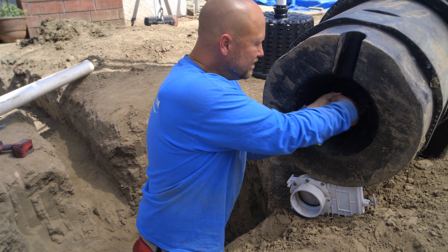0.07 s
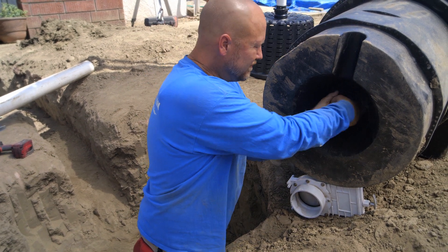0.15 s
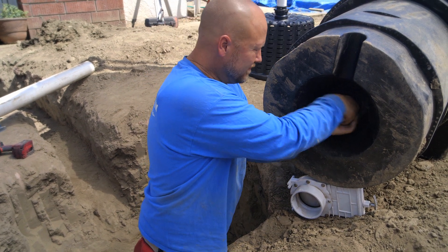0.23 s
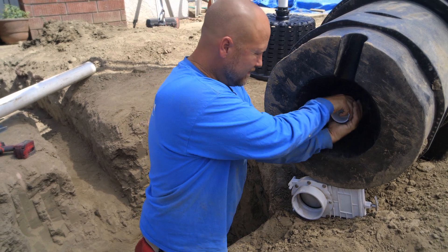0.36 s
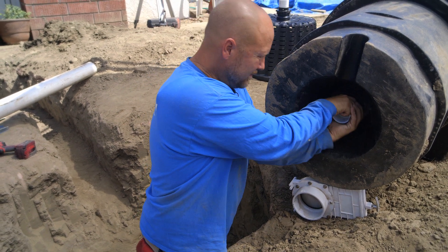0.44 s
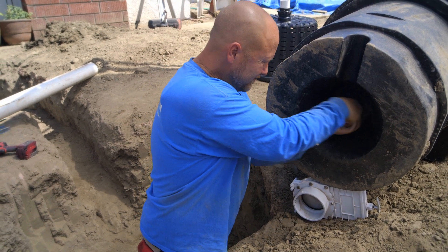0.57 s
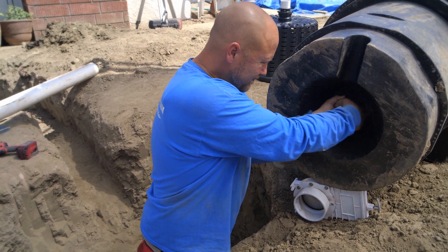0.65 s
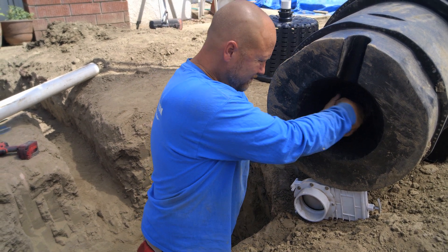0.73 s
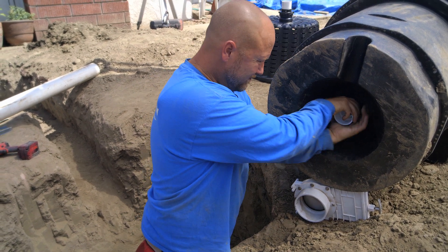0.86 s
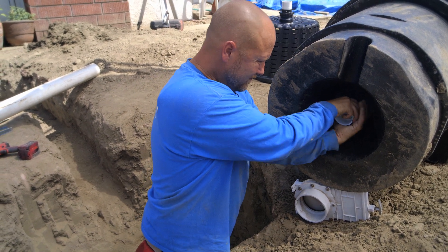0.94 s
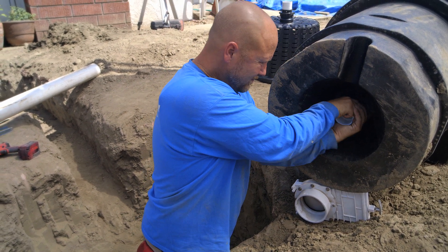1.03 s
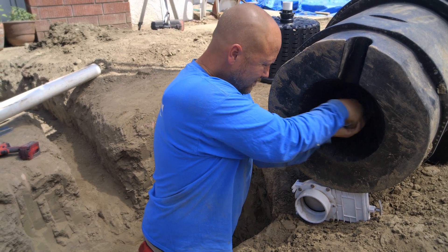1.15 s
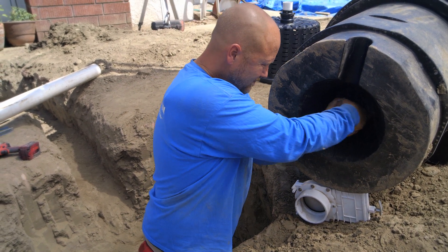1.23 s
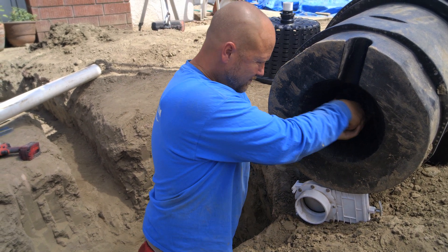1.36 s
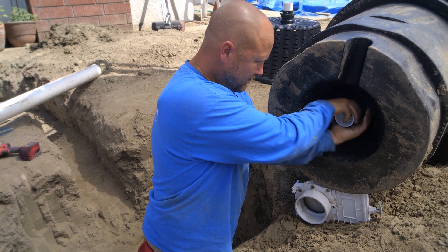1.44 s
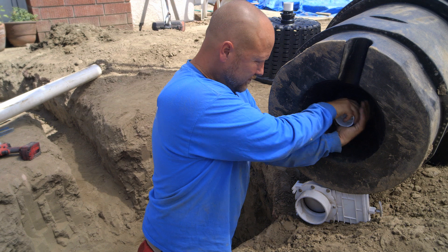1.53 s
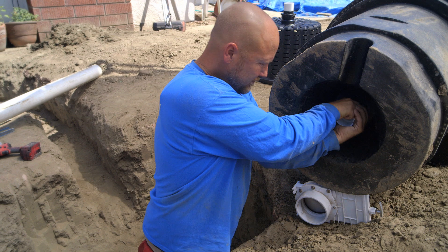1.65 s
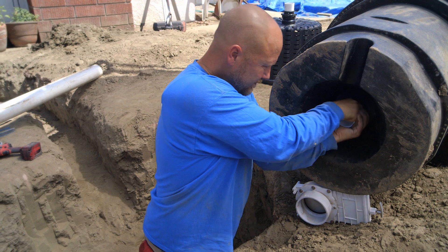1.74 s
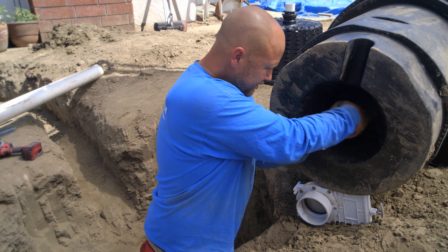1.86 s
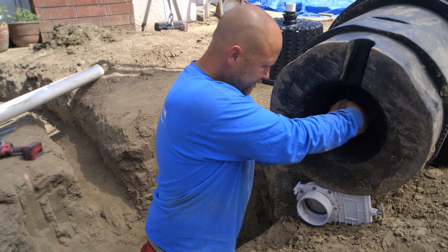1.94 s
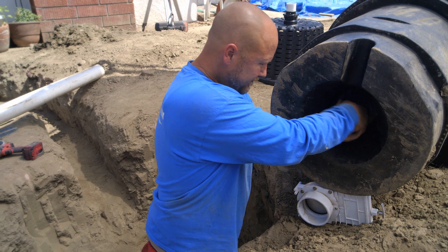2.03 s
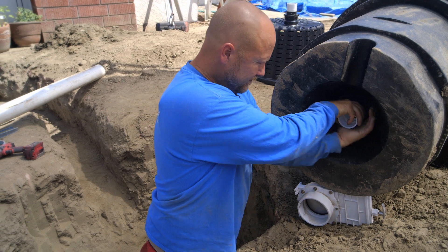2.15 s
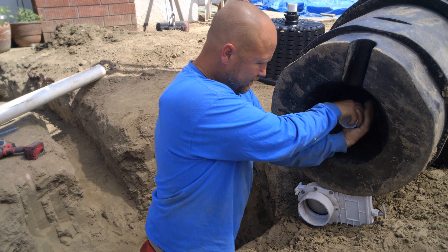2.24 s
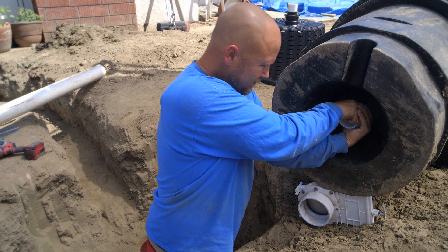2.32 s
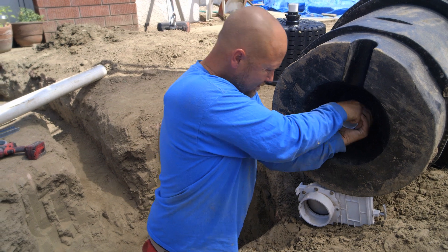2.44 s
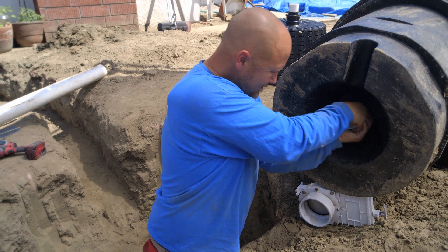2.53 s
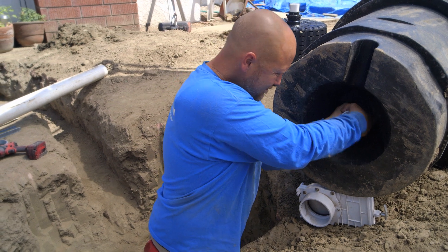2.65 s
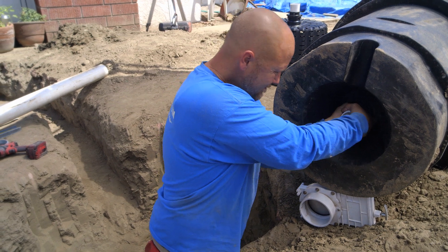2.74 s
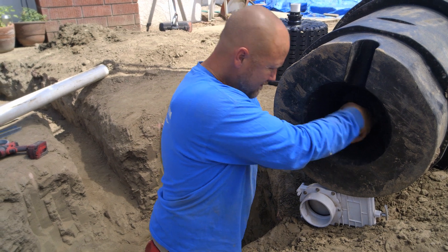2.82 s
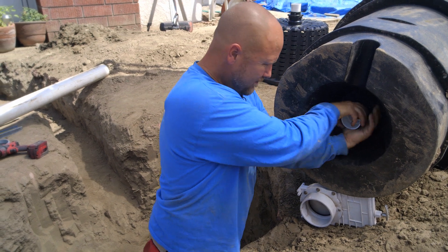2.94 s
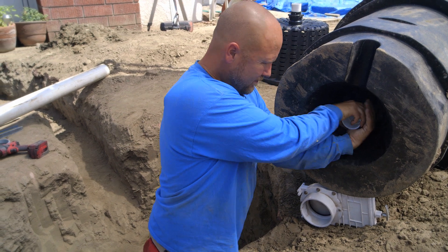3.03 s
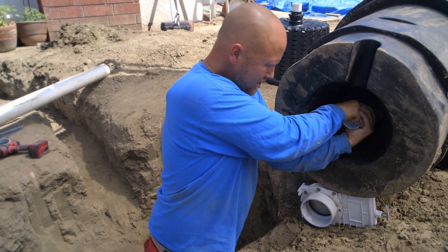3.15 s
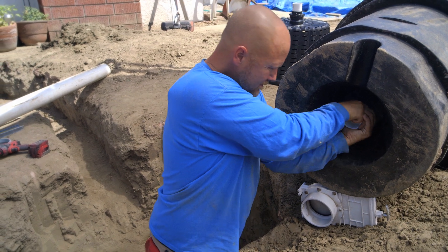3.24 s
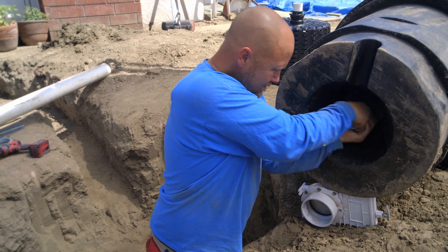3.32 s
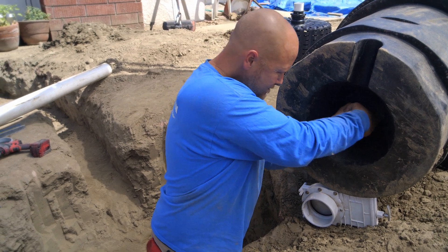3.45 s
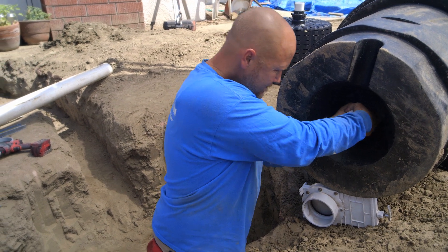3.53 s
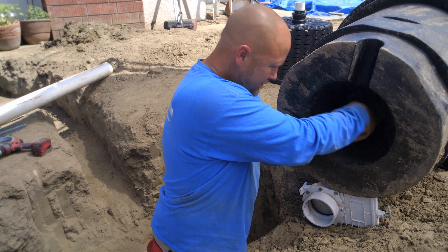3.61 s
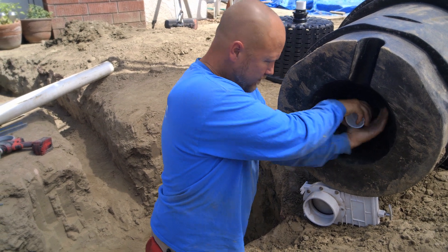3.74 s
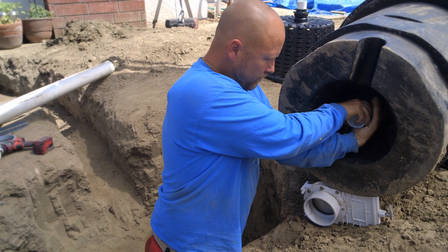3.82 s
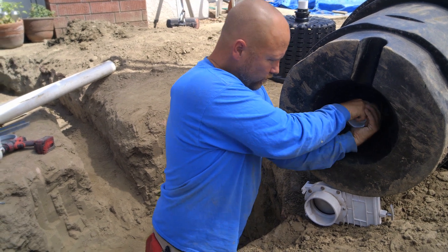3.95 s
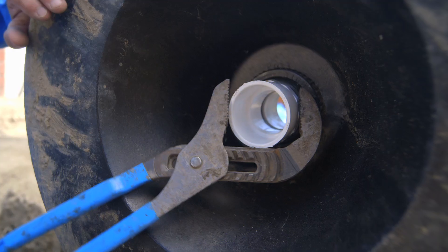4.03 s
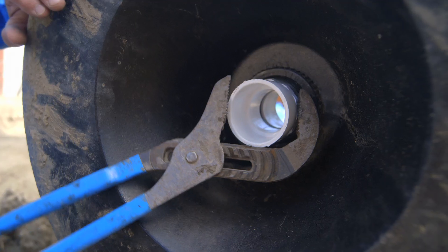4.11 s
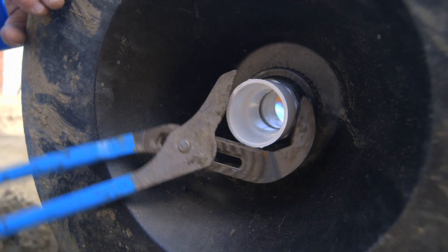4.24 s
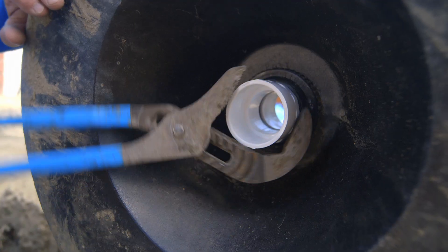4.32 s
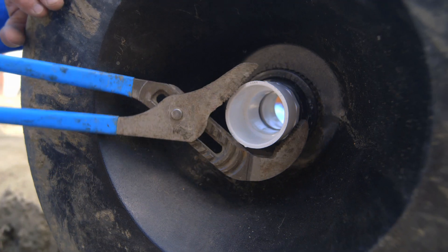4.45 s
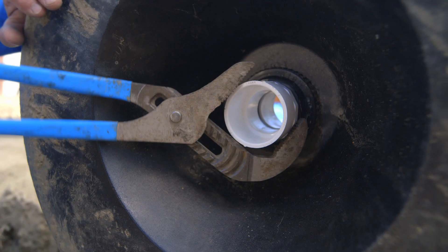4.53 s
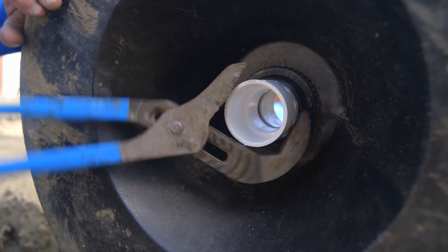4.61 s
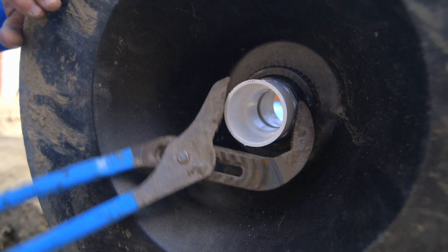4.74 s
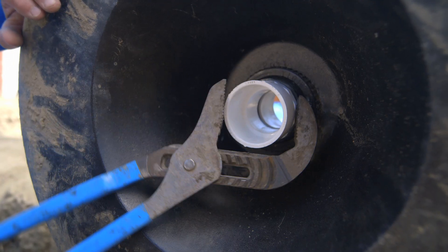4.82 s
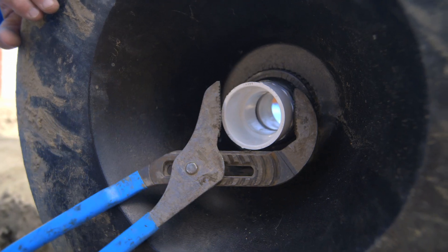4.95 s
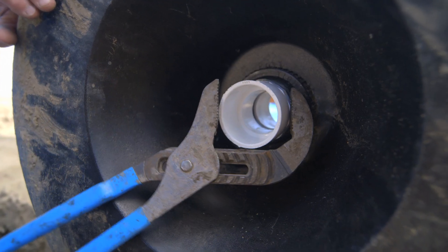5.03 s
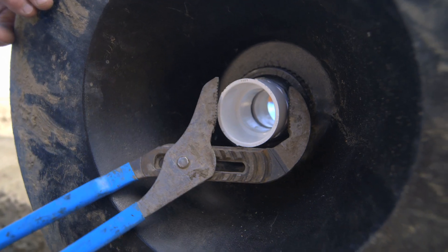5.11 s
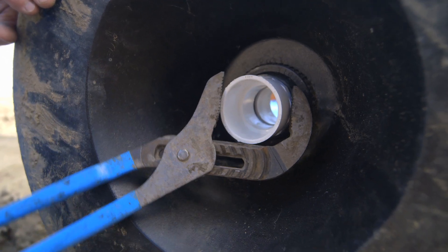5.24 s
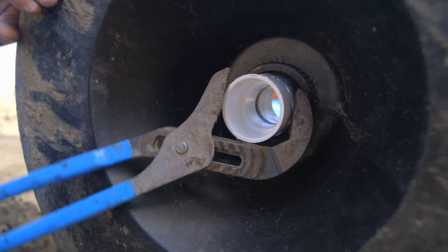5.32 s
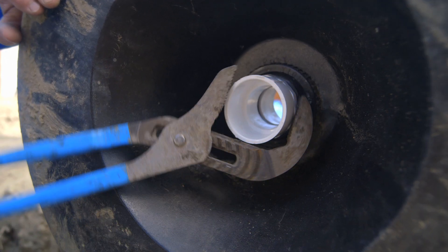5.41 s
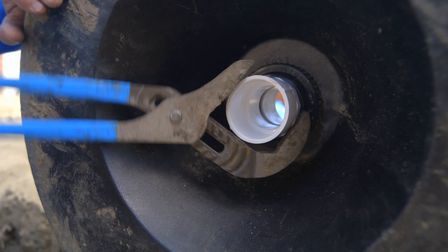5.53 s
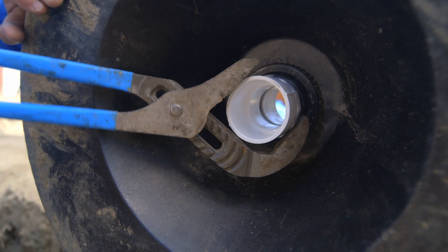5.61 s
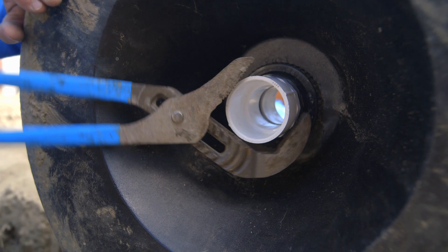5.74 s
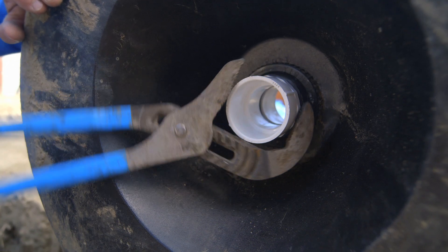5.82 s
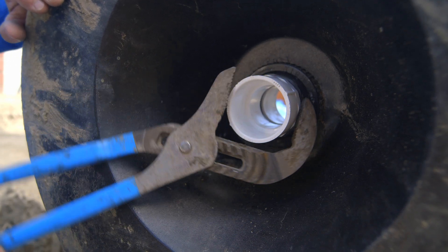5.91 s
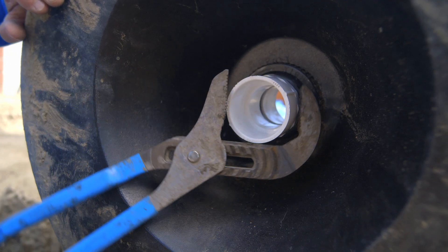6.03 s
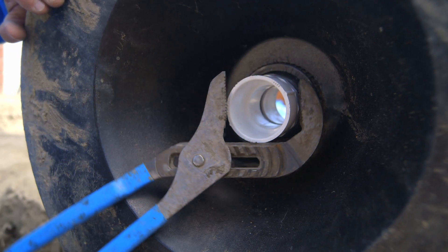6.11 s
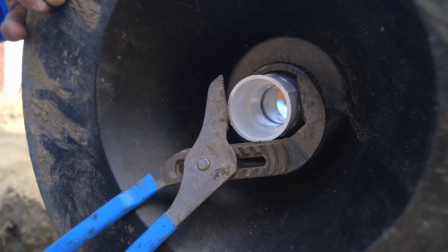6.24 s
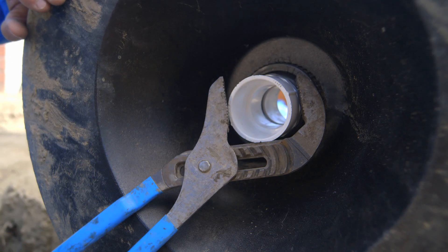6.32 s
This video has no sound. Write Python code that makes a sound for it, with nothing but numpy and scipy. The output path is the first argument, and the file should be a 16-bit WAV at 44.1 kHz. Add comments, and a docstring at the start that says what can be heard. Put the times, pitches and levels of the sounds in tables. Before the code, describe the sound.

Repeated hollow creaks and dry cracks come from a plastic fitting being twisted into an empty tank, with soft skin rubbing between the turns and a few faint squeaks. The last turns end in a bright rasp. Then, heard from close by, steel pliers drag around the fitting and bite in two bunches of clicks and knocks that resonate in the tank. Behind it all is quiet outdoor air.

```python
"""Hollow creaks and dry cracks, outdoors: a plastic adapter is screwed by hand into an empty tank.
The thread sticks and slips, each slip ringing the tank end; between turns the palm hisses over
the plastic and knuckles scuff the wall. After four seconds, heard from close by, steel pliers slide
round the adapter, bite, knock and rattle, sounding steel, plastic and tank together.
Skin and pivot squeak faintly, and quiet air with a low rumble lies under it all."""
import sys
import numpy as np
from scipy import signal
from scipy.fft import rfft, irfft, next_fast_len
from scipy.io import wavfile
from scipy.ndimage import uniform_filter1d

SR = 44100
rng = np.random.default_rng(int(sys.argv[2]) if len(sys.argv) > 2 else 0)


def waveform_to_disk(signal):
    """Save audio, clipped to [-1, 1], as 16-bit WAV at the path in sys.argv[1]."""
    frames = np.transpose(np.atleast_2d(signal))
    scaled = np.clip(frames, -1, 1) * 32767
    samples = np.round(scaled).astype(np.int16)
    wavfile.write(sys.argv[1], SR, samples)


N = 280917

# Tone colours of the noise layers. Each row: frequency in Hz, relative level per Hz in dB.
AIR_SPECTRUM = [(18, -45), (30, -3), (109, -3), (239, -7.5), (404, -15.5), (1070, -21), (1250, -25.5),
                (3400, -35), (16000, -50)]
RUMBLE_SPECTRUM = [(50, 3.5), (75, -5), (110, -22)]
CRACK_SPECTRUM = [(1500, 15.5), (2500, 4), (4000, 0.5), (6200, 2), (8000, -6.5), (11000, -8.5),
                  (15000, -25)]
PALM_SPECTRUM = [(1060, -24), (1800, 9), (2080, 2.5), (2670, 3), (3770, 1), (7360, 0.5), (12200, -11.5),
                 (16000, -23)]
SLIDE_SPECTRUM = [(1120, 2), (1900, -1), (6160, -4.5), (7910, -8.5), (12900, -16.5), (16000, -22)]
# Resonances. Each row: frequency in Hz, relative level in dB, seconds to die away by 60 dB.
TANK_FAR_MODES = [(109, 7.5, 0.0092), (206, -53, 0.047), (311.4, 6, 0.089), (335.5, 0.5, 0.061),
                  (524.6, -3, 0.04), (577.4, 6, 0.044), (823, 7.5, 0.043), (896, -5.5, 0.063),
                  (1375, -0.5, 0.035)]
GRIP_MODES = [(2850, 4, 0.001), (3210, -7, 0.0052), (4400, -3.5, 0.003), (6100, -13.5, 0.0055),
              (7300, -66, 0.0053)]
TANK_NEAR_MODES = [(116.2, 1.5, 0.062), (146.3, -14.5, 0.14), (243, -0.5, 0.061), (309, 0.5, 0.032)]
ADAPTER_MODES = [(665, 6, 0.036), (810, 14.5, 0.0099), (1014, 11.5, 0.034), (1477, 2, 0.029),
                 (2117, -18, 0.05), (2340, -13, 0.026), (2833, -8.5, 0.019)]
STEEL_MODES = [(3280, -36, 0.023), (4580, -29, 0.0084), (5050, 5, 0.031), (6070, 9, 0.01),
               (6800, 14, 0.0057), (8360, 13.5, 0.0039), (9730, 11, 0.0088), (12200, 3, 0.0028)]

# Single slips of the thread. Each row: start in seconds, tank ring and crack in relative dB.
THREAD_SLIPS = [(.038, -27, -50.5), (.084, -20.5, -44), (.122, -11.5, -37), (.132, -13, -40),
                (.2, -26.5, -45), (0.284, -23.5, -45), (0.642, -20, -36), (.66, -19, -39),
                (1.177, -19.5, -41), (1.213, -19.5, -35.5), (1.737, -13, -38), (1.78, -17, -37),
                (2.017, -12.5, -32), (2.458, -13, -29.5), (2.5, -18, -23), (2.524, -21, -28.5),
                (2.539, -10, -30), (2.565, -11, -34), (2.696, -11, -31.5), (2.71, -9.5, -32),
                (2.73, -12.5, -31), (3.302, -13.5, -54), (3.462, -10.5, -34), (3.598, -7, -31),
                (4.067, -18, -39)]
# Creaks are runs of slips. Each row: start and end in seconds, number of slips, rough ratio of
# last gap to first, then first ring, last ring and crack in relative dB.
THREAD_CREAKS = [(.142, 0.185, 4, .9, -6.5, -12.5, -32.5), (0.679, 0.733, 6, 1.03, -9.5, -6.5, -32.5),
                 (1.231, 1.331, 8, 1.11, -17.5, -11, -34), (1.829, 1.889, 4, .7, -12.5, -6.5, -32),
                 (1.914, 2.004, 9, 0.6, -7, -5, -27), (2.6, 2.671, 5, 1.14, -8.5, -6.5, -31.5),
                 (2.746, 2.785, 5, 1.046, -2.5, -4.5, -27.5), (3.332, 3.426, 5, .97, -11, -7, -27.5),
                 (3.495, 3.531, 4, 1.26, -8, -6.5, -30.5), (3.557, 3.574, 3, 0.97, -1.5, -5, -47)]
# The hand leans into the thread and lets go. Each row: peak time in seconds, grind in relative dB,
# rise and fall in seconds per 20 dB.
HAND_TURNS = [(0.174, -18, 0.26, .04), (.29, -40.5, 0.044, 0.13), (0.551, -26.5, 0.041, 0.059),
              (.65, -22, 0.037, 0.037), (0.729, -14.5, 0.11, 0.027), (1.129, -33.5, 0.034, 0.033),
              (1.324, -15.5, 0.23, 0.027), (1.455, -32.5, 0.037, 0.033), (1.554, -32, 0.043, 0.015),
              (1.744, -17.5, 0.052, 0.02), (2.0, -9.5, 0.18, 0.03), (2.249, -37, 0.33, 0.015),
              (2.461, -20.5, 0.067, 0.087), (2.784, -15, 0.28, 0.026), (2.92, -38, 0.08, 0.066),
              (3.234, -25.5, 0.14, 0.1), (3.393, -8.5, 0.098, 0.046), (3.578, -13.5, 0.15, 0.042),
              (3.884, -41, 0.29, 0.054), (4.041, -26, .07, 0.04)]
# The palm sweeps the plastic. Each row: middle and length in seconds, level in dB.
PALM_SWISHES = [(0.153, 0.11, -42), (0.355, 0.27, -52), (0.553, 0.037, -54), (0.703, 0.12, -39.5),
                (0.901, 0.27, -52), (1.19, 0.17, -55), (1.299, 0.072, -39.5), (1.476, 0.2, -53.5),
                (1.694, 0.61, -59.5), (2.169, 0.31, -56), (2.514, 0.018, -34), (2.522, 0.51, -47),
                (2.954, 0.41, -53.5), (3.328, 0.16, -43), (3.804, 0.64, -54), (4.027, 0.18, -50)]
# Knuckles on the tank wall. Each row: start in seconds, relative level in dB, decay in seconds.
KNUCKLE_SCUFFS = [(0.831, -46.5, 0.0051), (.96, -62, 0.0098), (1.54, -43, 0.0059), (3.819, -37.5, 0.022),
                  (3.85, -28.5, 0.02), (3.88, -31, 0.011)]
# Skin and pivot squeaks. Each row: start and length in seconds, first and last pitch in Hz, level in dB.
THIN_SQUEAKS = [(1.08, 0.078, 9800, 9300, -75), (3.18, 0.037, 8540, 8860, -56),
                (3.28, 0.033, 9800, 10500, -57), (4.19, 0.047, 9000, 9300, -68),
                (6.287, 0.03, 7440, 7200, -66), (6.32, 0.049, 8300, 8700, -61)]
# Envelope of the skidding grip. Each row: time in seconds, level in dB.
SKID_ENVELOPE = [(3.2, -51.5), (3.326, -45), (3.574, -34.5), (3.62, -50), (3.66, -77)]
# The jaws drag round the adapter. Each row: peak time in seconds, rise and fall in seconds per 20 dB,
# then tank boom, jaw scrape and sliding hiss in dB.
JAW_DRAGS = [(4.3, 0.0035, 0.053, -55, -70, -44), (4.4, 0.18, 0.68, -31.5, -48.5, -61),
             (4.51, 0.26, 0.043, -46, -52, -47), (4.73, 0.11, 0.082, -14.5, -28.5, -49),
             (4.85, 0.17, 0.046, -28, -38, -49), (4.955, 0.031, 0.21, -23, -34, -53.5),
             (5.108, 0.057, 0.14, -20, -48, -51), (5.678, 0.33, .05, -34, -51, -41.5),
             (5.75, 0.014, 0.035, -20, -50, -60), (5.864, 0.043, 0.037, -10, -22, -46),
             (5.991, 0.078, 0.086, -27, -26, -47), (6.079, 0.058, 0.055, -16.5, -36, -72),
             (6.18, 0.17, 0.3, -25, -47.5, -58)]
# The jaws strike. Each row: start in seconds, then adapter ring, tank boom and clack in relative dB.
JAW_BLOWS = [(4.296, -67, -51, -42), (4.579, -26.5, -11.5, -81), (4.641, -19.5, -34, -44.5),
             (4.668, -21.5, -4.5, -56), (4.705, -9.5, -22, -40), (4.715, -8, -39, -35),
             (4.739, -12.5, -7.5, -42), (4.797, -16, -31, -39.5), (4.82, -19, -20, -47),
             (4.841, -21.5, -13, -65), (4.942, -22, -14.5, -70), (5.086, -15, -7.5, -23),
             (5.741, -20, -9.5, -51), (5.783, -24, -10.5, -65), (5.821, -16.5, -43, -46),
             (5.843, -17, -0.5, -50), (5.856, -7.5, -2.5, -28.5), (5.886, -40, -10, -34.5),
             (6.059, -18, -12, -53), (6.082, -21.5, -13, -59), (6.101, -17, -11, -42),
             (6.129, -25.5, -13, -64), (6.168, -22, -12, -50), (6.194, -23, -15, -41),
             (6.273, -35.5, -20, -48), (6.344, -37.5, -21, -68)]
# Harder scraping draws a blow out. Each row: scrape level in dB, decay of the blow in seconds.
JAW_CONTACT = [(-49, 0.0028), (-31, 0.0061)]
# The jaws ease off. Each row: start and end in seconds; a row that ends before it starts is skipped.
JAW_LIFTS = [(4.55, 4.57), (4.89, 4.92), (5.058, 5.5), (5.71, 5.64)]

NEAR_S = 4.085  # the perspective moves from far to close
TANK_SPREAD = 0.0403  # bending waves: a mode arrives TANK_SPREAD / sqrt(Hz) seconds late
TIME = np.arange(N) / SR


def undb(db):
    """Decibels to gain."""
    return 10 ** (np.asarray(db) / 20)


def unit(x):
    """Scale to rms 1."""
    return x / np.sqrt(np.mean(x ** 2))


def colour(x, spectrum):
    """EQ through (Hz, dB) points, steep beyond the ends; white noise keeps its level."""
    hz, db = np.transpose(spectrum)
    size = next_fast_len(N)
    log_hz = np.log(np.fft.rfftfreq(size, 1 / SR) + 1)
    beyond = np.maximum(np.log(hz[0]) - log_hz, 0) + np.maximum(log_hz - np.log(hz[-1]), 0)
    gain = unit(undb(np.interp(log_hz, np.log(hz), db) - 30 * beyond))
    return irfft(rfft(x, size) * gain, size)[:N]


def ring(force, modes, spread=0, shift_db=0):
    """A force rings a body: spread delays low modes; shift_db varies the mix as the contact moves."""
    out, power, step = np.zeros(N), 0, SR // 40
    knots = N // step + 2
    for hz, db, t60 in modes:
        pole = np.exp(2j * np.pi * hz / SR - np.log(1000) / (t60 * SR))
        late = int(spread / np.sqrt(hz) * SR)
        drift = np.interp(np.arange(N) / step, np.arange(knots), rng.standard_normal(knots))
        mode = signal.lfilter([1], [1, -pole], undb(shift_db * drift) * force).imag
        out[late:] += undb(db) * mode[:N - late]
        power += undb(db) ** 2 / (1 - abs(pole) ** 2) / 2
    return out / np.sqrt(power)


def bursts(times, db, rise_s, fall_s, firm=0):
    """A short push at each time: ragged noise, plus a firm one-way share."""
    t = np.arange(2048) / SR
    envelope = (1 - np.exp(-t / rise_s)) * np.exp(-t / np.reshape(fall_s, (-1, 1)))
    pushes = (firm + rng.standard_normal((len(times), len(t)))) * envelope
    out = np.zeros(N + 2 * len(t))
    for start_s, gain, push in zip(times, undb(db), pushes):
        i = int(start_s * SR)
        out[i:i + len(t)] += gain * unit(push)
    return out[:N]


def grit(per_s, scatter_db, grain_s):
    """Noise whose level jumps with every grain that catches between two surfaces."""
    hits = (rng.random(N) < per_s / SR) * undb(scatter_db * rng.exponential(size=N))
    level = signal.lfilter([1], [1, -np.exp(-1 / (grain_s * SR))], hits)
    return unit((unit(level) + 0.86) * rng.standard_normal(N))


def strokes(peak_s, db, rise_s, fall_s):
    """Summed swells of effort, climbing 20 dB in rise_s and dropping 20 dB in fall_s."""
    t = TIME - peak_s[:, None]
    drop_db = 20 * np.where(t < 0, -t / rise_s[:, None], t / fall_s[:, None])
    return undb(db[:, None] - drop_db).sum(axis=0)


def outdoor_air():
    """A quiet bed of air, with a low rumble that is stronger from further off."""
    rumble_gain = undb(np.where(TIME < NEAR_S, -39, -63.5))
    rumble = rumble_gain * colour(rng.standard_normal(N), RUMBLE_SPECTRUM)
    return undb(-48) * colour(rng.standard_normal(N), AIR_SPECTRUM) + rumble


def slips():
    """Stick-slip, singly and in creaks that speed up or slow down: times, ring dB, crack dB."""
    rows = [np.array(THREAD_SLIPS)]
    for first_s, last_s, count, gap_ratio, first_db, last_db, crack_db in THREAD_CREAKS:
        along = np.linspace(0, 1, round(count))
        place = np.cumsum(gap_ratio ** along) - 1
        times = first_s + (last_s - first_s) * place / place[-1]
        ring_db = first_db + (last_db - first_db) * along
        jitter = rng.standard_normal((len(along), 3)) * [.001, 2, 2]  # seconds, dB, dB
        rows.append(np.c_[times, ring_db, np.full_like(along, crack_db)] + jitter)
    return np.concatenate(rows).T


def thread():
    """Slips jolt the tank end and crack; small catches grind where the thread turns freely."""
    times, ring_db, crack_db = slips()
    # a slip's force lies well under the peak that it rings up
    jolts = bursts(times, ring_db - 26.5, rise_s=.00005, fall_s=.0001, firm=4)
    # between close slips the thread is stuck and hardly grinds
    onsets = np.bincount((times * SR).astype(int), minlength=N).astype(float)
    stuck = np.minimum(uniform_filter1d(onsets, size=1300) * 1300, 1)
    free = 1 - .78 * uniform_filter1d(stuck, size=300)
    # the moving palm also shakes the thread
    effort = strokes(*np.transpose(HAND_TURNS)) + undb(7) * palm_swells()
    catches = free * effort * grit(per_s=150, scatter_db=0.81, grain_s=0.0039)
    snaps = bursts(times, crack_db - 13, rise_s=0.00053, fall_s=0.0025)
    crack = colour(snaps + 0.077 * catches, CRACK_SPECTRUM)
    return ring(jolts + catches, TANK_FAR_MODES, TANK_SPREAD, shift_db=2.5) + crack


def palm_swells():
    """The rounded envelope of the moving palm."""
    return sum(undb(db) * np.cos(np.pi * np.clip((TIME - middle_s) / length_s, -.5, .5)) ** 2
               for middle_s, length_s, db in PALM_SWISHES)


def palm_hiss():
    """Skin rubs over plastic, swelling out of a light rustle."""
    rustle = undb(-69) * (TIME < NEAR_S)
    friction = grit(per_s=900, scatter_db=0.71, grain_s=0.0022)
    return (palm_swells() + rustle) * colour(friction, PALM_SPECTRUM)


def knuckle_scuffs():
    """Knuckles brush the tank wall; the light touch favours its upper modes."""
    times, db, contact_s = np.transpose(KNUCKLE_SCUFFS)
    force = 10 * np.gradient(bursts(times, db, rise_s=0.0021, fall_s=contact_s))
    return ring(force, TANK_FAR_MODES, TANK_SPREAD, shift_db=2.5)


def squeaks():
    """Skin and the pliers' pivot give faint whistles that glide and waver."""
    out = np.zeros(N)
    for start_s, length_s, first_hz, last_hz, db in THIN_SQUEAKS:
        i, n = int(start_s * SR), int(length_s * SR)
        waver = uniform_filter1d(1500 * rng.standard_normal(N), size=200)[:n]
        hz = np.linspace(first_hz, last_hz, n) + waver
        tone = undb(db) * np.hanning(n) ** .5 * np.sin(2 * np.pi * np.cumsum(hz) / SR)
        out[i:i + n] += tone[:N - i]
    return out


def grip_skid():
    """The grip skids on the tightening adapter with a bright rasp."""
    level = undb(np.interp(TIME, *np.transpose(SKID_ENVELOPE), left=-200, right=-200))
    return ring(level * grit(per_s=1200, scatter_db=1, grain_s=0.0046), GRIP_MODES)


def jaw_drags():
    """Envelopes of boom, scrape and hiss, ducking 11 dB while the jaws lift."""
    peak_s, rise_s, fall_s, *layers_db = np.transpose(JAW_DRAGS)
    lifted = sum((TIME > start_s) & (TIME < end_s) for start_s, end_s in JAW_LIFTS)
    duck = undb(-11 * uniform_filter1d(lifted.astype(float), size=200))
    return [duck * strokes(peak_s, db, rise_s, fall_s) for db in layers_db]


def pliers():
    """Jaw blows ring tank, adapter and steel; dragging jaws boom, scrape and hiss."""
    boom, scrape, hiss = jaw_drags()
    times, ring_db, boom_db, clack_db = np.transpose(JAW_BLOWS)
    scrape_db = 20 * np.log10(scrape[(times * SR).astype(int)])
    contact_s = np.interp(scrape_db, *np.transpose(JAW_CONTACT))

    thumps = bursts(times, boom_db - 27, rise_s=0.00023, fall_s=0.00014, firm=5)
    judder = boom * grit(per_s=60, scatter_db=0.61, grain_s=0.0091)
    tank = ring(thumps + judder, TANK_NEAR_MODES, TANK_SPREAD)

    knocks = bursts(times, ring_db - 14, rise_s=0.00085, fall_s=contact_s)
    scraping = scrape * grit(per_s=400, scatter_db=2.5, grain_s=.003)
    # plastic yields under the jaws and takes no sharp force
    softened = signal.sosfilt(signal.butter(2, 4000, fs=SR, output="sos"), knocks + scraping)
    adapter = ring(softened, ADAPTER_MODES, shift_db=4)

    clacks = bursts(times, clack_db - 7.5, rise_s=.0001, fall_s=contact_s)
    sliding = hiss * grit(per_s=560, scatter_db=3, grain_s=0.0016)
    steel = .5 * ring(clacks + 0.044 * sliding, STEEL_MODES, shift_db=4)
    contact_noise = colour(0.48 * clacks + sliding, SLIDE_SPECTRUM)
    return tank + adapter + steel + contact_noise


def scene():
    """All sources at one microphone."""
    mix = outdoor_air() + thread() + palm_hiss() + knuckle_scuffs() + squeaks() + grip_skid() + pliers()
    return mix[None]


def record(dry):
    """The microphone drops the deepest bass; the recorder cuts the top."""
    low_cut = signal.butter(6, 75.8, "high", fs=SR, output="sos")
    high_cut = signal.ellip(10, .2, 80, 15900, fs=SR, output="sos")
    return signal.sosfilt(high_cut, signal.sosfilt(low_cut, dry))


dry = scene()
out = record(dry)
waveform_to_disk(out)
```